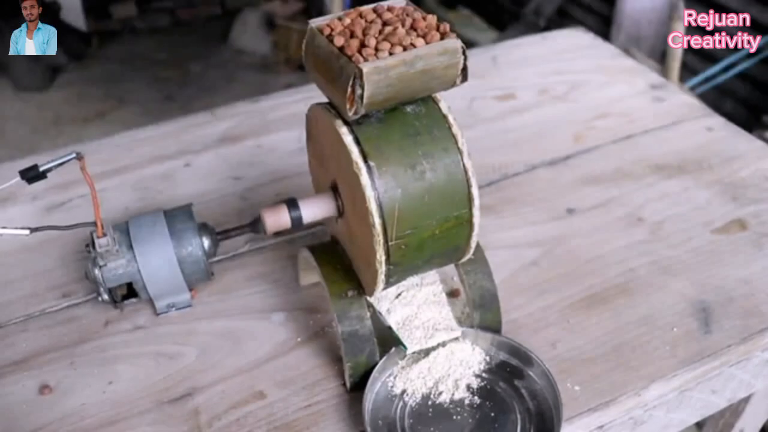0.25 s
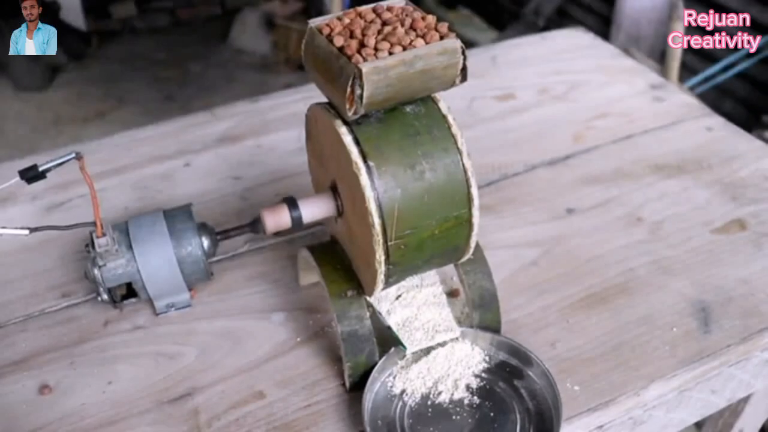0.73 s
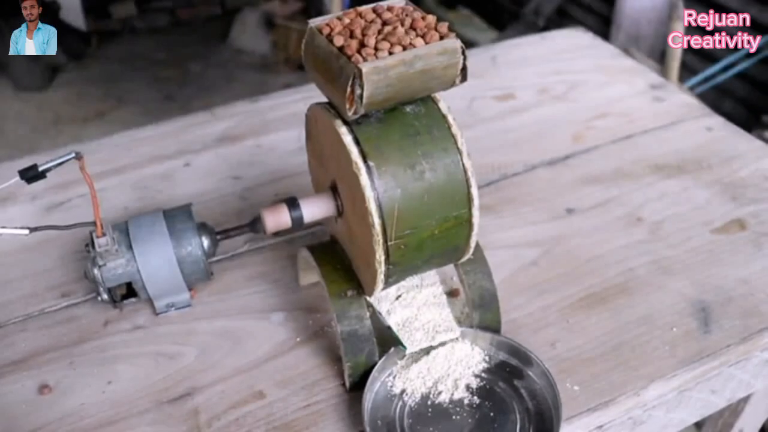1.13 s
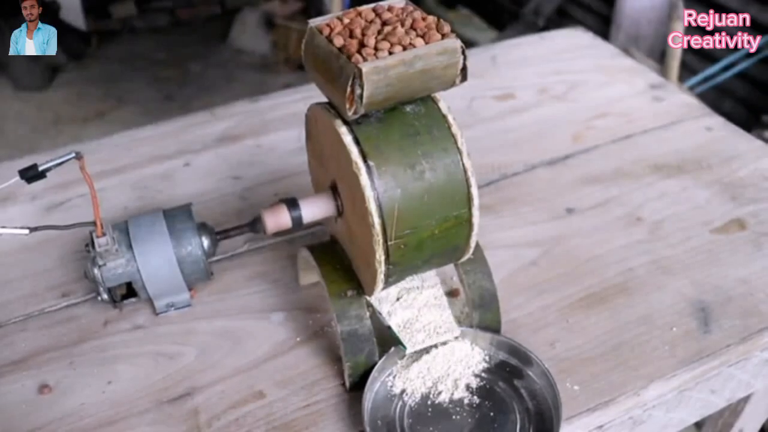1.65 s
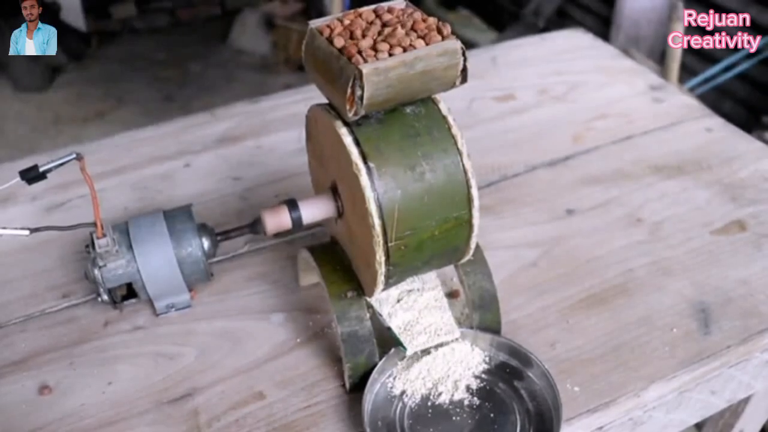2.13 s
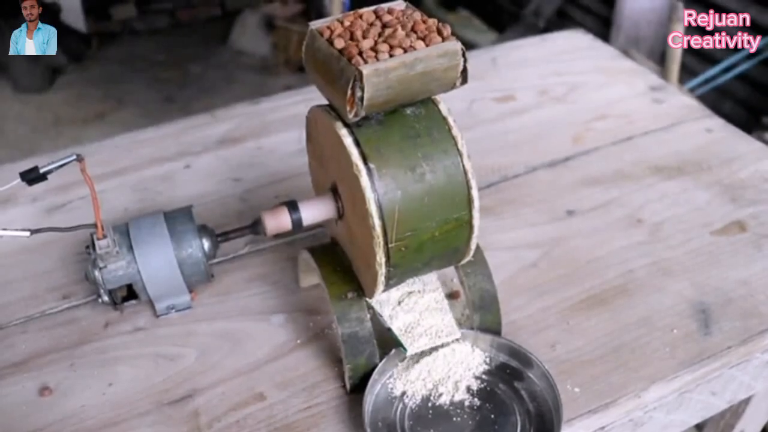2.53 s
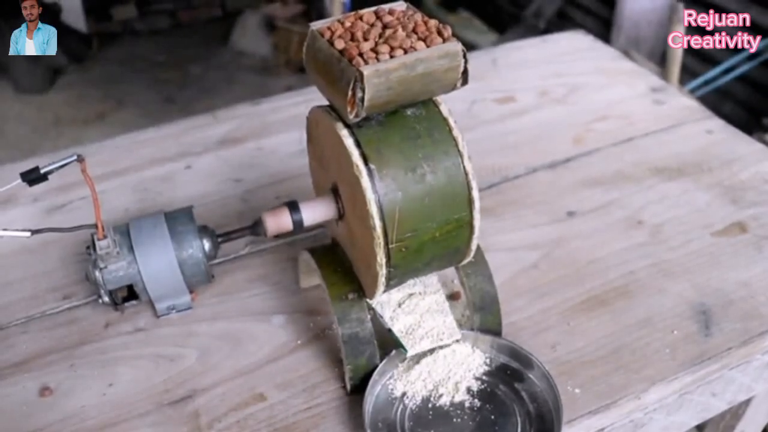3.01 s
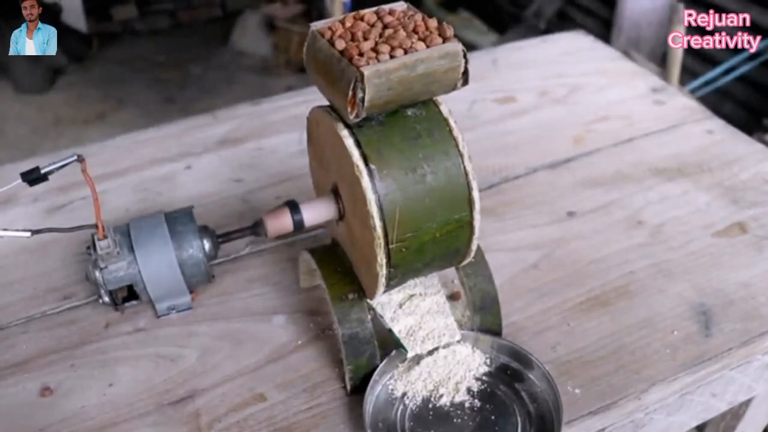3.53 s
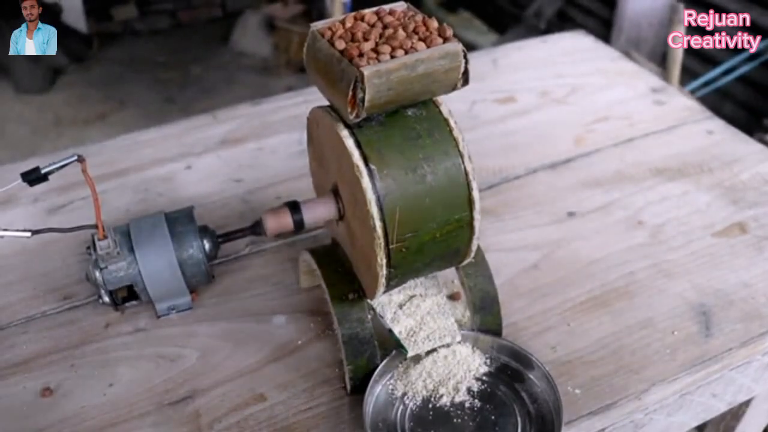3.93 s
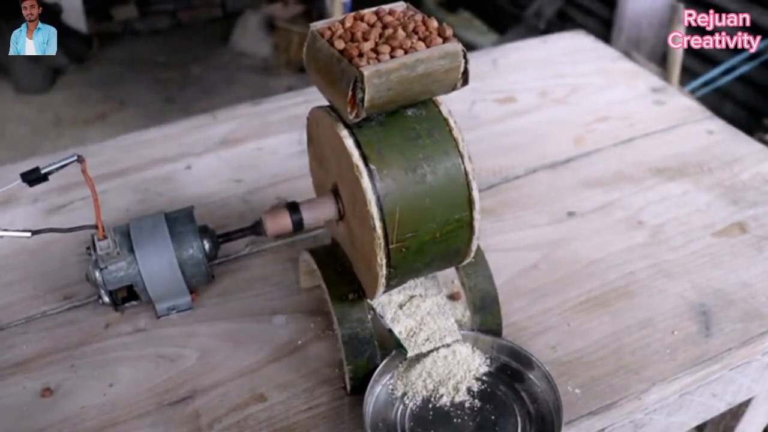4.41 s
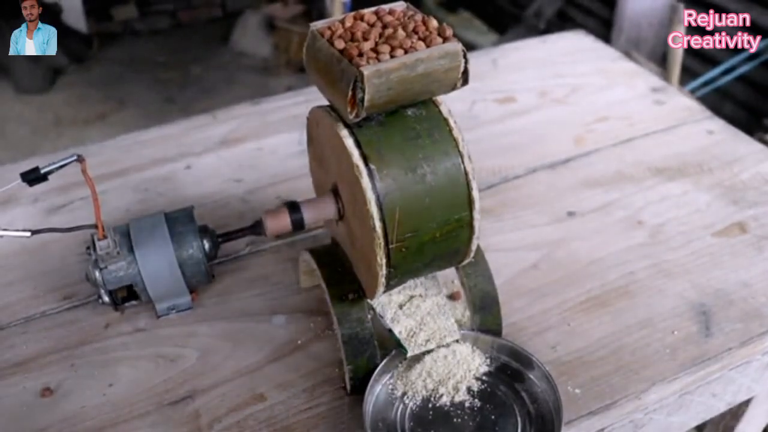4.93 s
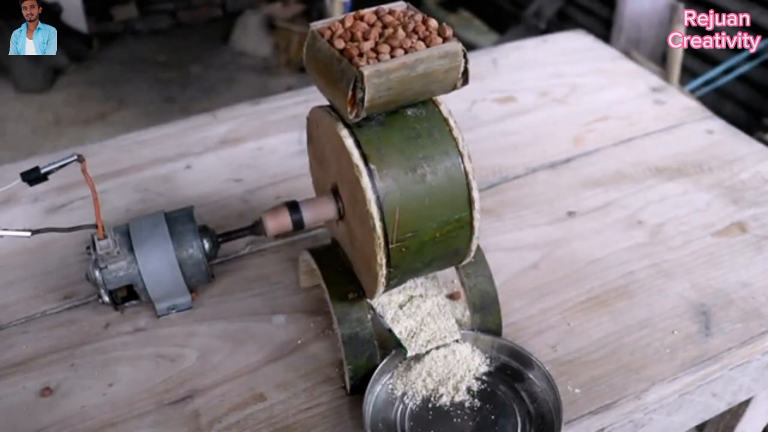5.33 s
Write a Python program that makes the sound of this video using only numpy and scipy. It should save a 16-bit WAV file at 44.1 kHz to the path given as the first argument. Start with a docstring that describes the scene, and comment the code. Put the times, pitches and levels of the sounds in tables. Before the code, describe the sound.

A small electric motor starts droning almost at once, turning a homemade drum mill on a wooden table. Kernels crunch in uneven clumps, with many sharp cracks and a fine hiss of spilling meal. The hum wavers and swells under strain, the table rattles, and hard pieces occasionally knock the frame. The two loudest cracks come near the end. It sounds close, indoors, with little echo.

```python
"""A small electric motor turns a homemade drum mill on a wooden table indoors.
At 0.15 s the drive comes in, droning near 300 Hz, and the table shakes. The plates crush kernels
in uneven clumps; wedged kernels strain the drive, hard ones knock the frame. Each sharp crack
frees the plates for a moment and spills meal with a hiss. The two loudest come at 5.2 and 5.5 s."""
import sys
import numpy as np
from scipy import signal
from scipy.fft import rfft, irfft, next_fast_len
from scipy.io import wavfile
from scipy.ndimage import uniform_filter1d

SR = 44100
rng = np.random.default_rng(int(sys.argv[2]) if len(sys.argv) > 2 else 0)


def to_wav(sig):
    """Store sig (one row per channel, or 1-D mono) as 16-bit WAV at the path in sys.argv[1].

    Samples outside -1..1 are clipped; the rate is SR.
    """
    pcm = np.clip(np.atleast_2d(sig), -1, 1) * 32767
    pcm = np.round(pcm).astype(np.int16)
    wavfile.write(sys.argv[1], SR, pcm.T)  # frames by channels


N = 245195

# kernels cracking: start_s, ring_db, pitch_hz, snap_db
KERNEL_CRACKS = [(0.1702, -3, 2650, -15.5), (0.1998, -4, 2930, -16), (0.206, -4, 2580, -23),
                 (0.216, -7.5, 4100, -31), (0.2957, -7.5, 2540, -25), (0.348, -5, 3200, -15),
                 (0.3765, -7.5, 3120, -17), (0.392, -12, 2580, -5), (0.4328, -9, 2700, -9.5),
                 (0.4888, -9, 2420, -26), (0.5048, -10, 2530, -15.5), (0.5247, -4.5, 3200, -15),
                 (0.5467, -5, 3340, -18.5), (0.5658, -13, 2620, -20.5), (0.6, -13, 2670, -16),
                 (0.657, -10, 2140, -14.5), (0.6836, -6, 2560, -14.5), (0.7, -7, 2470, -22),
                 (0.873, -2.5, 1920, -30), (0.9996, -5, 2680, -11.5), (1.0429, -12, 1940, -18),
                 (1.115, -23, 2800, -14), (1.2408, -6, 2660, -13.5), (1.3372, -5, 2930, -18),
                 (1.4099, -1, 3030, -9), (1.4318, -20, 2720, -22), (1.45, -5, 2680, -14),
                 (1.4725, -11, 3600, -29), (1.4912, -12.5, 2010, -19), (1.511, -8.5, 3100, -15.5),
                 (1.573, -8, 2720, -21), (1.8956, 1, 3150, -23), (1.9995, 1.5, 2870, -8.5),
                 (2.0433, -7.5, 2520, -22), (2.0647, -9.5, 2580, -22), (2.1287, -5.5, 2430, -20),
                 (2.2119, -6.5, 2740, -18.5), (2.3447, -5, 3200, -17), (2.382, -17, 1940, -15),
                 (2.406, -7, 2670, -15), (2.509, -4, 2030, -12.5), (2.6051, -7, 2720, -16),
                 (2.83, -4, 1880, -32), (2.8904, -8.5, 2700, -20), (3.1885, 1.5, 2600, -35),
                 (3.2128, -5.5, 3420, -16.5), (3.236, -14, 3050, -16), (3.3937, -3, 2650, -14),
                 (3.4065, -3.5, 3180, -12), (3.4415, -7.5, 2660, -17), (3.4975, -8.5, 2880, -32),
                 (3.738, -5, 3160, -32), (3.927, -4.5, 3400, -28), (3.9737, -4, 3180, -16.5),
                 (3.9812, -8, 3470, -16), (4.016, -6.5, 3360, -45), (4.043, -14, 3330, -22),
                 (4.0762, -21, 1880, -19), (4.0988, -6, 4060, -35), (4.1798, -31, 2580, -16),
                 (4.316, -3.5, 2050, -28), (4.346, -8.5, 2360, -30), (4.793, -18, 2620, -13),
                 (4.819, 3.5, 2950, -28), (4.83, -0.5, 3140, -13), (4.9158, -9.5, 2820, -13),
                 (5.035, -2.5, 2500, -10), (5.126, -5, 2010, -38), (5.164, 8.5, 2750, -0.5),
                 (5.2413, -3, 2730, -12.5), (5.3245, -1, 3800, -17), (5.4384, -12, 2610, -15.5),
                 (5.5251, 8, 2820, -4)]
# snap of a kernel: freq_hz, density_db
SNAP_SPECTRUM = [(500, 6), (1500, -4.5), (3500, 3), (4900, 6.5), (6000, -9.5), (7000, -2), (7700, 8.5),
                 (9000, -3.5), (10300, -3.5), (10900, -0.5), (12500, -11.5), (15000, -7)]
# drum wall resonances: freq_hz, width_hz, gain_db
WALL_MODES = [(901, 14.4, 12.5), (1213, 132, 3.5), (1450, 74, -9.5), (1950, 150, -2.5), (2184, 32, 4.5),
              (2554, 340, 4.5), (3220, 84, 7)]
# table and frame resonances: freq_hz, width_hz, gain_db
WOOD_MODES = [(70, 3.8, -8), (109, 16, -12), (156.2, 9.2, 2.5), (199.3, 16.8, 6), (312.4, 24, 12.5),
              (330, 145, -16), (423.6, 11.8, 4), (454, 11, -30), (566, 40, -5)]
# broad shake of the table: freq_hz, density_db
WOOD_SPECTRUM = [(20, 9), (45, -15), (80, -1.5), (180, 5), (250, -6.5), (450, 8.5), (700, 1.5), (1200, -43),
                 (4000, -81)]


def from_db(db):
    """Decibels to gain."""
    return 10 ** (np.asarray(db) / 20)


def unit_rms(x):
    """Scale to unit power."""
    return x / np.sqrt(np.mean(x ** 2) + 1e-20)


def evened(x, span_s):
    """Hold the power at 1 over span_s, keeping faster detail."""
    power = uniform_filter1d(np.mean(np.atleast_2d(x) ** 2, axis=0), max(int(span_s * SR), 2))
    return x / np.sqrt(np.maximum(power, 0) + 1e-12)


def add(track, start_s, sound):
    """Mix a sound in at start_s."""
    at = int(start_s * SR)
    track[:, at:at + sound.shape[1]] += sound[:, :N - at]


def per_bin(points):
    """Interpolate a table over log frequency at every FFT bin."""
    hz, value = np.transpose(points)
    bins_hz = np.fft.rfftfreq(next_fast_len(N + SR // 2, True), 1 / SR)
    return np.interp(np.log(bins_hz + 1), np.log(hz), value)


def filtered(x, response):
    """Apply a response given per FFT bin."""
    size = 2 * (len(response) - 1)
    return irfft(rfft(x, size) * response)[..., :N]


def coloured(x, spectrum):
    """Minimum-phase filter with the given spectrum."""
    cepstrum = irfft(np.log(from_db(per_bin(spectrum))))
    half = len(cepstrum) // 2
    cepstrum[1:half] *= 2
    cepstrum[half + 1:] = 0
    return filtered(x, np.exp(rfft(cepstrum)))


def resonance(x, hz, width_hz):
    """Two-pole resonator, peak gain 1."""
    r = np.exp(-np.pi * width_hz / SR)
    feedback = [1, -2 * r * np.cos(2 * np.pi * hz / SR), r * r]
    return signal.lfilter(np.array([1, 0, -1]) * (1 - r * r) / 2, feedback, x + 1e-18)


def modes(x, rows):
    """Resonators in parallel."""
    return sum(from_db(gain_db) * resonance(x, hz, width_hz) for hz, width_hz, gain_db in rows)


def without_bass(x, low_cut_hz):
    """High-pass: little sound below low_cut_hz."""
    return signal.sosfilt(signal.butter(2, low_cut_hz, "high", fs=SR, output="sos"), x)


def spread(pair):
    """Two unrelated signals become left and right, most alike in the bass."""
    # left-right likeness: freq_hz, correlation
    likeness = [(60, 0.99), (330, 1), (600, 0.87), (1200, 0.61), (2500, 0.68), (4200, 0.97), (6000, 0.04),
                (7800, 0.88), (11000, 0.19), (15000, 0.18)]
    alike = np.clip(per_bin(likeness), 0, .999)
    mid = filtered(pair[0], np.sqrt((1 + alike) / 2))
    side = filtered(pair[1], np.sqrt((1 - alike) / 2))
    return np.array([mid + side, mid - side])


def drift(rate_hz):
    """Smooth random wander, unit RMS."""
    step, settle = 10, 4000
    r = np.exp(-2 * np.pi * rate_hz * step / SR)
    noise = rng.standard_normal(N // step + settle + 2)
    slow = signal.lfilter([1], [1, -2 * r, r * r], noise)[settle:]
    return np.interp(np.arange(N) / step, np.arange(len(slow)), unit_rms(slow))


def grains(per_s, size_db):
    """Tiny fractures as random impulses of uneven size, two channels."""
    born = rng.random(N) < per_s / SR
    size = from_db(size_db * np.minimum(rng.exponential(1, N), 4))
    return born * size * rng.choice([-1, 1], (2, N))


def flurries(per_s, size_db, decay_s):
    """Puffs of fracture noise that start at random and die fast."""
    pole = np.exp(-1 / (decay_s * SR))
    swell = signal.lfilter([1], [1, -pole], np.abs(grains(per_s, size_db)[0]) + 1e-18)
    return swell * rng.standard_normal((2, N))


def burst(rise_s, decay_s, abruptness=1.48):
    """One short rush of fractures that swells and breaks off, two channels."""
    t = np.arange(SR // 20) / SR
    swell = (1 - np.exp(-(t / rise_s) ** 2)) * np.exp(-(t / decay_s) ** abruptness)
    return rng.standard_normal((2, len(t))) * swell / swell.max()


def grip(start_s, length_s, attack_s, release_s=0.031):
    """The plates seize a clump, hold it and let go: 0 to 1."""
    t = np.maximum(np.arange(N) / SR - start_s, 0)
    return (1 - np.exp(-t / attack_s)) * np.exp(-np.maximum(t - length_s, 0) / release_s)


def after_cracks(exponent, peak_s):
    """Each crack leaves a swell topping out after peak_s; height 1 for a 0 dB crack."""
    age = np.arange(SR // 2) / SR / peak_s
    hits = np.zeros(N)
    for start_s, ring_db, _, _ in KERNEL_CRACKS:
        hits[int(start_s * SR)] += from_db(exponent * ring_db)
    return np.maximum(signal.fftconvolve(hits, age * np.exp(1 - age))[:N], 0)


def loading(idle_crush_db=-26, idle_drone_db=-26.5, crush_relief_db=3, drone_relief_db=3.5):
    """Crushing and drone levels: clumps raise both, wedged kernels swell the drone, cracks ease both."""
    # clumps between the plates, levels above idle: start_s, length_s, clump_db, labour_db
    clumps = [(0.179, 0.22, 10, 7.5), (0.63, 0.072, 4.0, 11.5), (0.777, 0.225, 11.5, 11),
              (0.995, 0.11, 8.5, 18.5), (1.122, 0.09, 11, 9), (1.217, 0.191, 7.0, 7.5),
              (1.487, 0.25, 3.5, 11.5), (1.607, 0.271, 9.5, 9.5), (1.946, 0.066, 10.5, 19),
              (2.074, 0.05, 8, 23.5), (2.158, 0.24, 7.5, 10.5), (2.442, 0.17, 5, 12),
              (2.633, 0.155, 10, 11.5), (2.757, 0.27, 11.0, 13), (3.02, 0.18, 9, 11.5),
              (3.258, 0.13, 12.0, 9.5), (3.386, 0.11, 1.0, 11.5), (3.509, 0.269, 10.5, 14.5),
              (3.804, 0.14, 10.5, 12), (3.935, 0.235, 9.5, 12), (4.222, 0.185, 10, 10.5),
              (4.394, 0.335, 12, 8.5), (4.696, 0.137, 10, 7), (4.851, 0.049, 11.5, 14),
              (4.94, 0.094, 10.5, -2), (5.038, 0.29, 8.5, 7.5), (5.17, 0.12, 4.5, 7.5),
              (5.295, 0.121, 11, 10), (5.457, 0.081, 13.5, 5)]
    # drive straining until a wedged kernel gives: give_s, surge_db
    surges = [(0.864, 8.5), (0.942, 8), (1.812, 6), (1.89, 13), (2.94, 6.5), (3.015, 2), (4.178, 11),
              (4.515, 5), (4.816, 7.5), (5.438, 11.5)]
    surge_rise_s, surge_fall_s = 0.022, 0.0094
    crush_db = strain_db = np.zeros(N)
    for start_s, length_s, clump_db, labour_db in clumps:
        crush_db = np.maximum(crush_db, clump_db * grip(start_s, length_s, attack_s=0.022))
        strain_db = np.maximum(strain_db, labour_db * grip(start_s, length_s, attack_s=0.043))
    for give_s, surge_db in surges:
        t = np.arange(N) / SR - give_s
        width_s = np.where(t < 0, surge_rise_s, surge_fall_s)
        strain_db = strain_db + surge_db * np.exp(-(t / width_s) ** 2)
    relief = np.tanh(after_cracks(exponent=1.4, peak_s=0.023))
    load_db = idle_crush_db + crush_db - crush_relief_db * relief
    drone_db = idle_drone_db + strain_db - drone_relief_db * relief
    return load_db, drone_db


def room(x, t60_s=0.16, gain_db=-10, band_hz=(500, 5000), first_s=0.0017):
    """Short, dull tail of reflections, different on each side."""
    t = np.arange(SR // 2) / SR
    tail = rng.standard_normal((2, len(t))) * from_db(-60 * t / t60_s) * (t > first_s)
    tail = signal.sosfilt(signal.butter(1, band_hz, "band", fs=SR, output="sos"), tail)
    tail /= np.sqrt(2 * np.sum(tail ** 2))
    return from_db(gain_db) * signal.fftconvolve(x, tail, axes=1)[:, :N]


def meal_flow(load_db, mean_db=-33, spill_db=-28):
    """Meal level in dB: it runs faster under load, and each crack spills crumbs."""
    steady = from_db(mean_db + load_db - load_db.mean()) ** 2
    crumbs = from_db(spill_db) ** 2 * after_cracks(exponent=0.74, peak_s=0.035)
    return 10 * np.log10(steady + crumbs)


def meal(level_db, bite, bite_db=5.5):
    """Fine grit fizzes between the plates."""
    # meal rubbing: freq_hz, density_db
    rub_spectrum = [(1500, -22), (3000, 12), (4200, 5), (5500, 3.5), (6700, -2), (7800, -2), (9000, 1),
                    (11000, -9), (13000, -10), (15000, -11)]
    grit = grains(per_s=12000, size_db=2.5) * from_db(bite_db * bite)
    return from_db(level_db) * evened(spread(coloured(grit, rub_spectrum)), span_s=0.23)


def husks(meal_db, gain_db=7):
    """Bits of husk tick at random, more often when the meal runs freely."""
    busy = from_db(0.33 * (meal_db - meal_db.mean()))
    ticks = flurries(per_s=24 * busy, size_db=-1.2, decay_s=0.0012)
    return from_db(meal_db + gain_db) * spread(coloured(ticks, SNAP_SPECTRUM))


def wood(force, broad_db):
    """Table and frame answer a force with their modes and a broad shake."""
    return spread(modes(force, WOOD_MODES) + from_db(broad_db) * coloured(force, WOOD_SPECTRUM))


def table_shake(load_db, drone_db, bite, bite_db=4.5, drive_share=0.25, gain_db=-2):
    """Jolts from the mill ring the table, following the crushing and partly the drive."""
    shake_db = load_db + drive_share * (drone_db - drone_db.mean() - load_db + load_db.mean())
    jolts = grains(per_s=1500, size_db=3.5) * from_db(bite_db * bite)
    return from_db(shake_db + gain_db) * evened(wood(jolts, broad_db=-17), span_s=0.15)


def knocks(gain_db=9):
    """Hard kernels wedge between the plates and knock the wood."""
    # blows on the frame: start_s, level_db
    frame_blows = [(0.386, -8.5), (1.863, -1.5), (2.508, 1), (2.59, -1.5), (2.828, -4), (3.395, -5),
                   (4.918, -10), (5.514, -2)]
    force = np.zeros((2, N))
    for start_s, level_db in frame_blows:
        add(force, start_s, from_db(level_db + gain_db) * burst(rise_s=0.0013, decay_s=0.0038))
    return without_bass(wood(force, broad_db=-5), low_cut_hz=120)


def drive_drone(level_db, pitch_hz=298.6, waver_hz=3.524, roughness=0.34, flutter_hz=24):
    """The drive's tone staggers in strength and phase as kernels catch."""
    hz = pitch_hz + waver_hz * drift(rate_hz=5.95)
    tone = np.exp(2j * np.pi * np.cumsum(hz) / SR)
    stagger = 1 + roughness * (drift(flutter_hz) + 1j * drift(flutter_hz))
    return from_db(level_db) * evened((tone * stagger).real, span_s=0.06)


def crushing(load_db, bite, bite_db=2.5, crunch_db=3, gain_db=-0.93):
    """Fine fractures and pitched crunches, denser under load, sound through the drum wall."""
    # crushing heard through the drum: freq_hz, density_db
    drum_spectrum = [(300, -25), (700, -17.5), (1000, 3), (1600, 0), (1900, 6), (2300, -1.5), (2900, 0),
                     (3500, -11.5), (4200, -2), (5200, -21), (6600, -62), (10000, -15), (15000, -17.5)]
    busy = from_db(0.5 * (load_db - load_db.mean()))
    fine = unit_rms(coloured(grains(per_s=3500 * busy, size_db=2), drum_spectrum))
    pieces = sum(resonance(flurries(per_s=16 * busy, size_db=2.6, decay_s=0.004), hz, width_hz=800)
                 for hz in np.geomspace(1150, 3700, num=9))
    crunches = from_db(crunch_db) * unit_rms(coloured(pieces, drum_spectrum))
    breaks = (fine + crunches) * from_db(bite_db * bite)
    wall = breaks + modes(breaks, WALL_MODES)
    return from_db(load_db + gain_db) * evened(spread(wall), span_s=0.091)


def cracks(width_hz=1500, ring_gain_db=-7, snap_gain_db=4, wall_db=-5, split_s=0.0028, growth=0.31):
    """A kernel splits in milliseconds, a hard one for longer: a snap, and a ring that wakes the wall."""
    rings, snaps = np.zeros((2, 2, N))
    mean_snap_db = np.mean([snap_db for *_, snap_db in KERNEL_CRACKS])
    for start_s, ring_db, pitch_hz, snap_db in KERNEL_CRACKS:
        decay_s = split_s * from_db(growth * (snap_db - mean_snap_db))
        ring = resonance(burst(rise_s=0.00084, decay_s=decay_s), pitch_hz, width_hz)
        ring = resonance(ring, pitch_hz, 3 * width_hz)
        onset_rms = np.sqrt(np.mean(ring[:, :SR // 250] ** 2, axis=1, keepdims=True))
        add(rings, start_s, from_db(ring_db + ring_gain_db) * ring / onset_rms)
        add(snaps, start_s, from_db(snap_db + snap_gain_db) * burst(rise_s=0.00075, decay_s=decay_s))
    wall = from_db(wall_db) * modes(rings, WALL_MODES)
    return spread(rings + wall + coloured(snaps, SNAP_SPECTRUM))


def stereo_ports(sound, lag_s=3.4e-5):
    """Sound reaches the left port first; the balance varies with frequency."""
    # balance: freq_hz, left_minus_right_db
    balance = [(300, .5), (1100, .6), (2200, -2), (4500, -1.7), (8000, 0), (11000, 2.4), (15000, 2)]
    balance_db = per_bin(balance)
    lead = np.exp(1j * np.pi * np.linspace(0, SR / 2, len(balance_db)) * lag_s)
    left = filtered(sound[0], from_db(balance_db / 2) * lead)
    right = filtered(sound[1], from_db(-balance_db / 2) / lead)
    return np.array([left, right])


def scene(start_s=0.15, rise_s=0.04):
    """Clumps load the mill; one uneven bite roughens crushing, meal and table shake together."""
    load_db, drone_db = loading()
    meal_db = meal_flow(load_db)
    bite = 0.54 * drift(rate_hz=46.6) + 0.28 * drift(rate_hz=104)
    kernels = crushing(load_db, bite) + meal(meal_db, bite) + husks(meal_db) + cracks()
    frame = table_shake(load_db, drone_db, bite) + knocks()
    running = np.clip((np.arange(N) / SR - start_s) / rise_s, 0, 1)
    mill = running * (without_bass(kernels, low_cut_hz=480) + frame)
    return stereo_ports(mill + room(mill) + running * drive_drone(drone_db))


def record(dry, threshold_db=4, release_db_per_s=250, clip_level=0.92, cutoff_hz=15300):
    """Peak limiter, soft clip, steep low-pass."""
    peak_db = 20 * np.log10(np.abs(dry).max(axis=0) + 1e-9)
    over_db = np.maximum(peak_db - threshold_db, 0)
    release_db = release_db_per_s * np.arange(N) / SR
    limited = dry * from_db(release_db - np.maximum.accumulate(over_db + release_db))
    rounded = limited / (1 + (limited / clip_level) ** 8) ** (1 / 8)
    return signal.sosfilt(signal.ellip(10, .1, 80, cutoff_hz, fs=SR, output="sos"), rounded)


dry = scene()
out = record(dry)
to_wav(out)
```